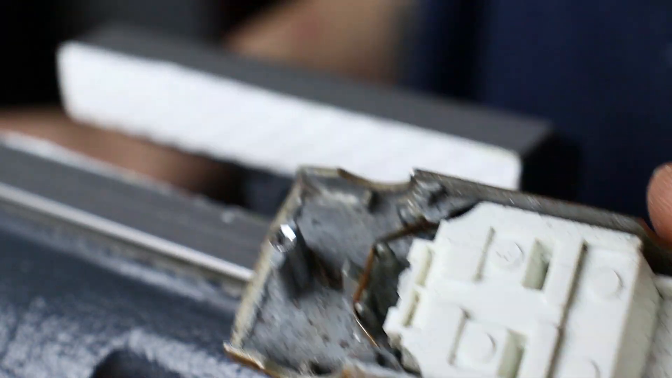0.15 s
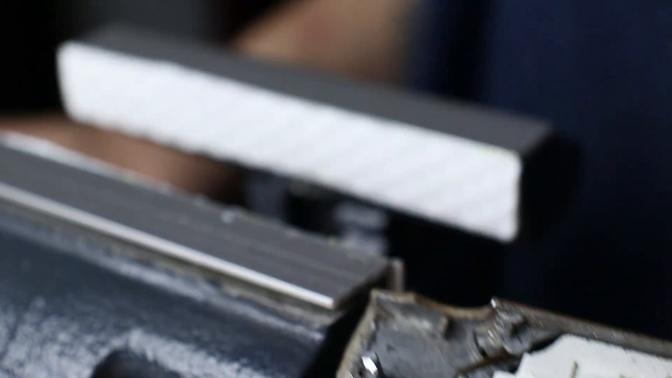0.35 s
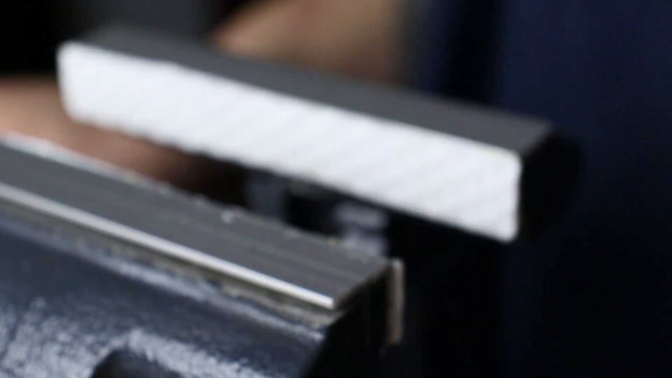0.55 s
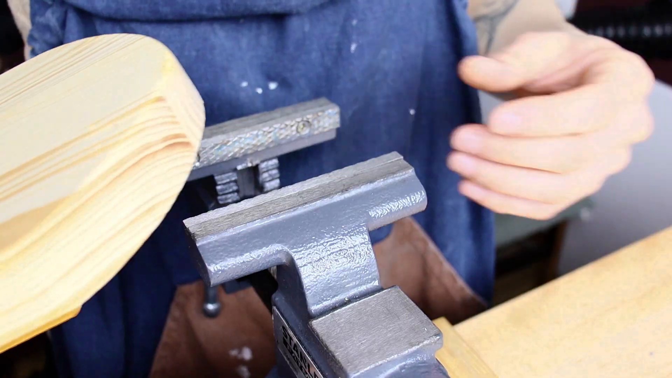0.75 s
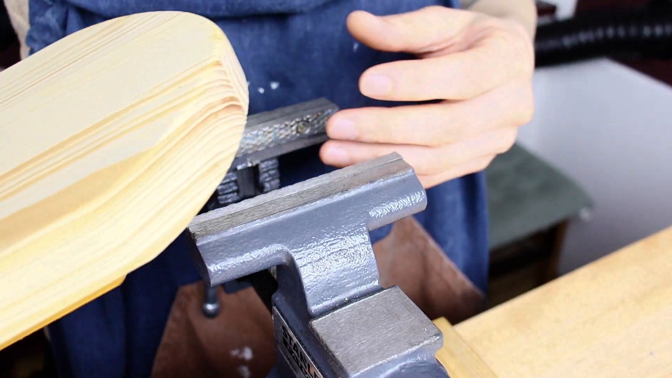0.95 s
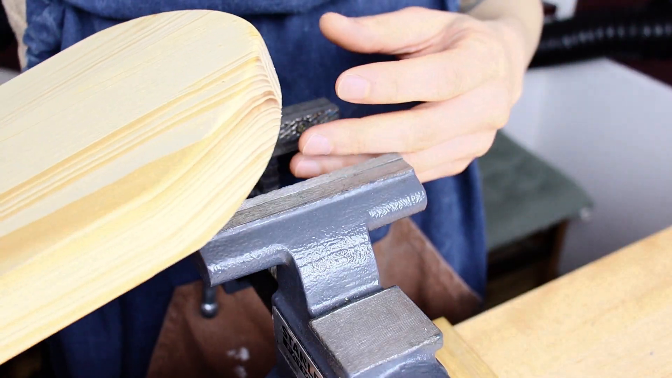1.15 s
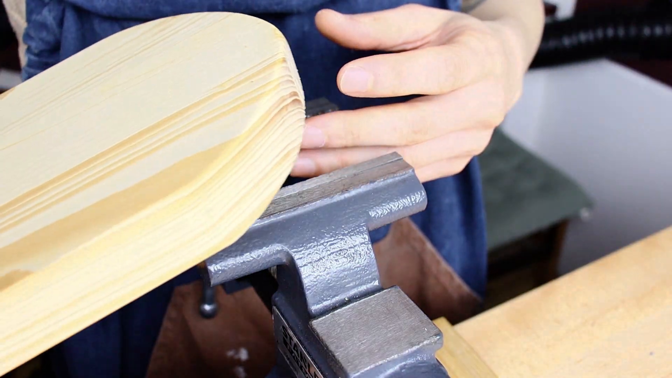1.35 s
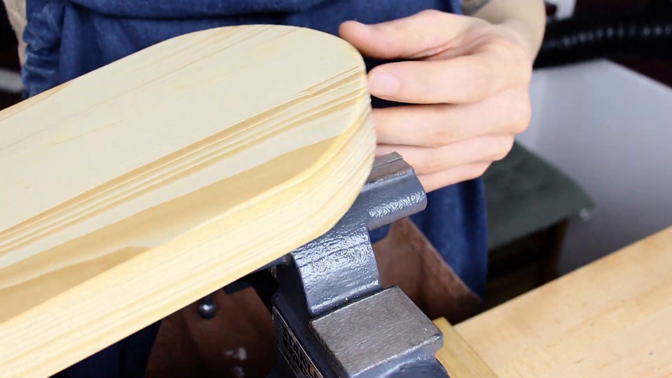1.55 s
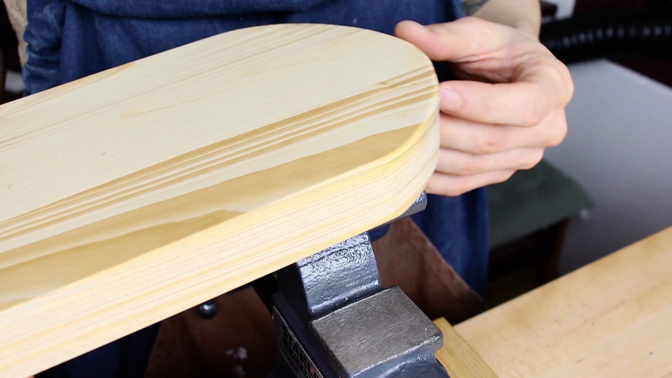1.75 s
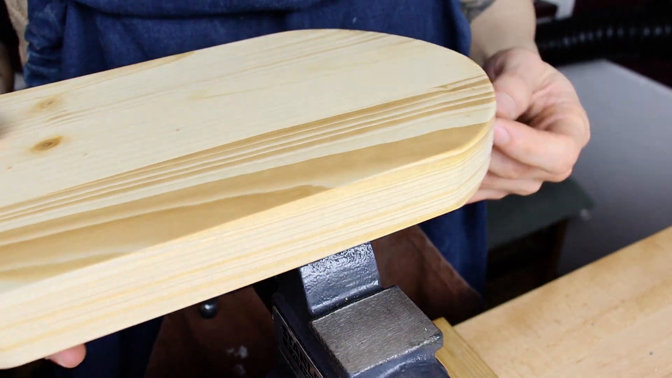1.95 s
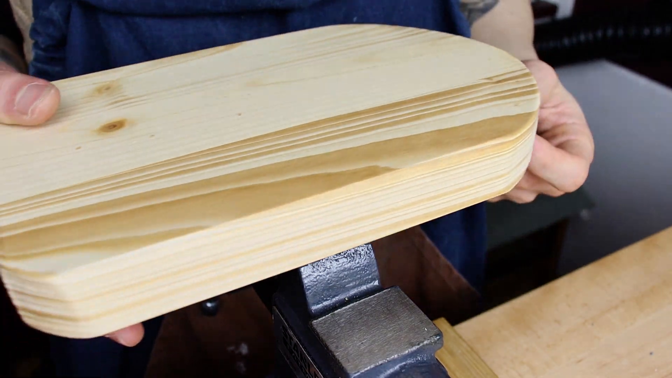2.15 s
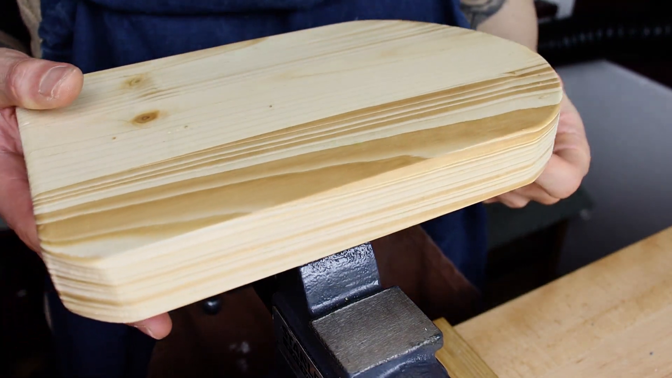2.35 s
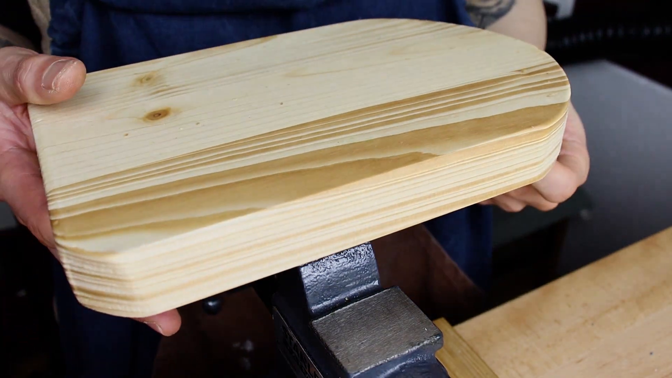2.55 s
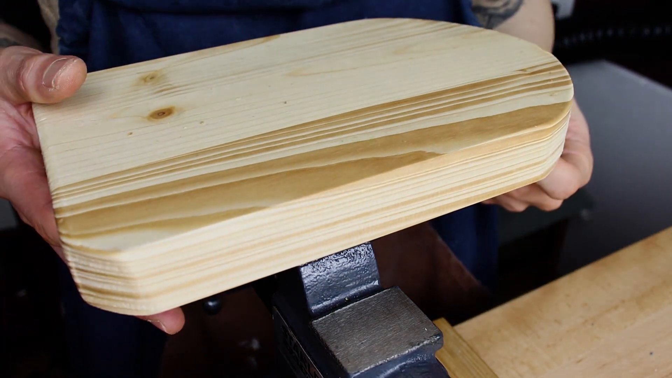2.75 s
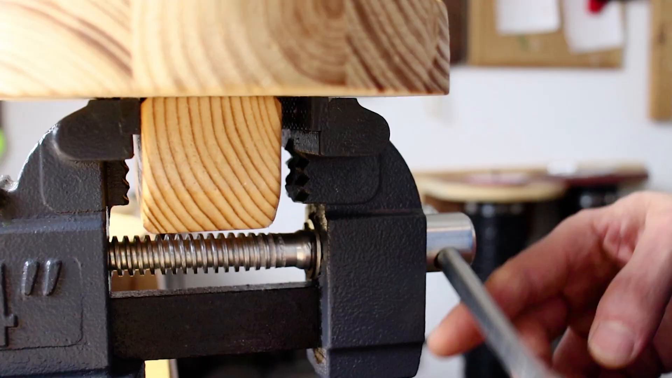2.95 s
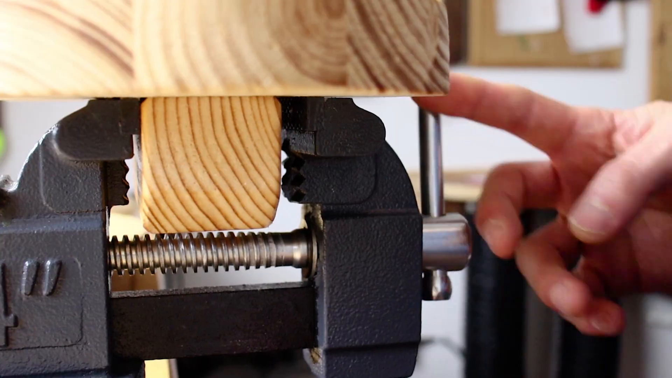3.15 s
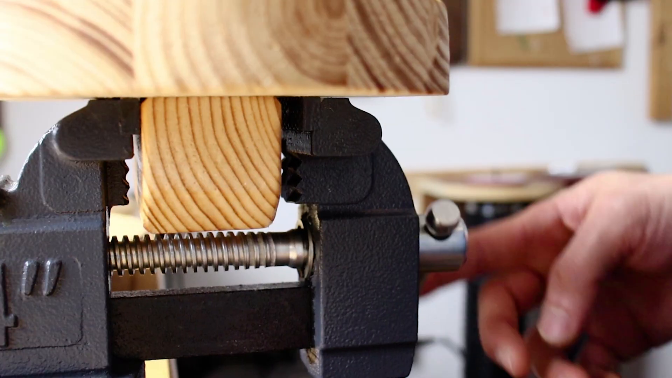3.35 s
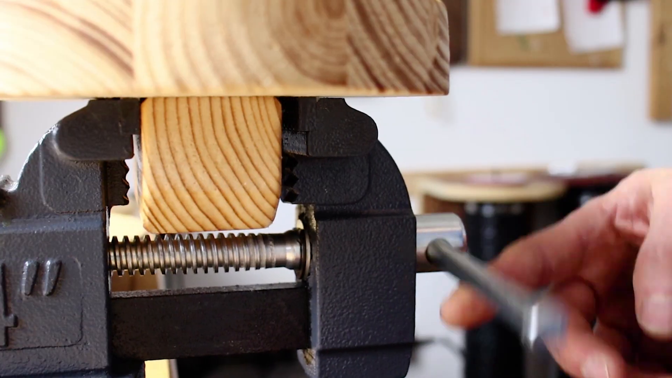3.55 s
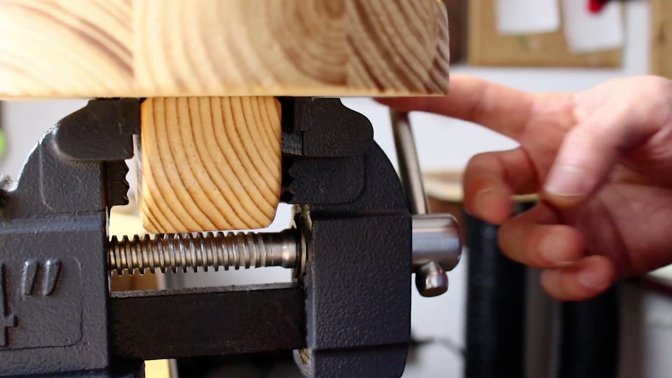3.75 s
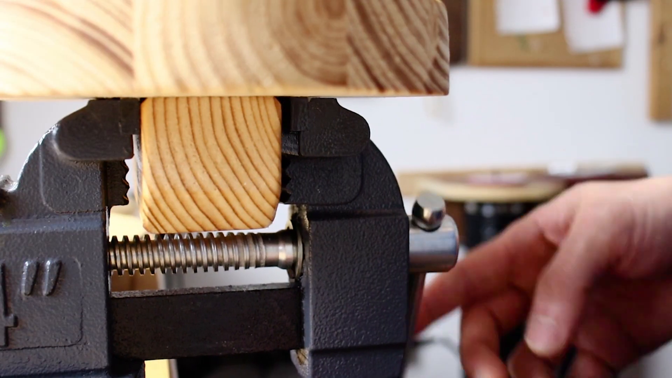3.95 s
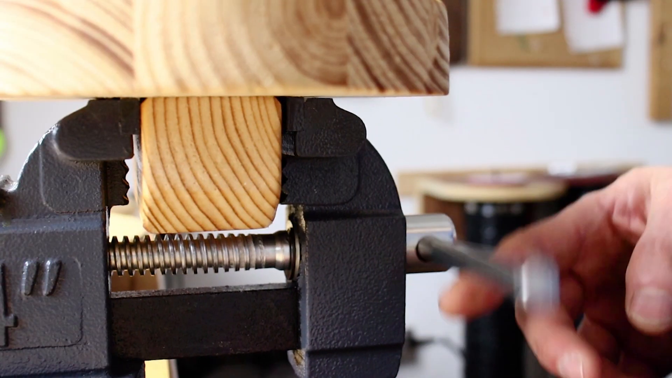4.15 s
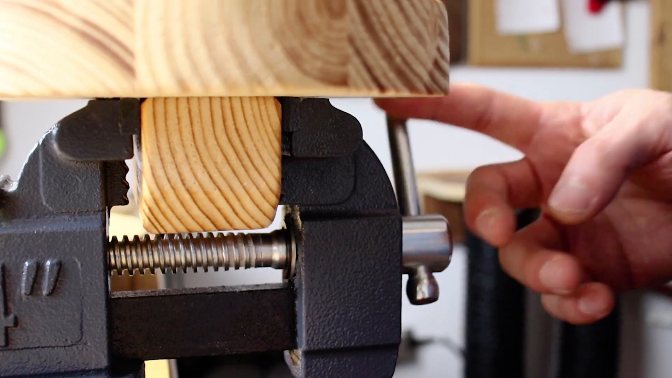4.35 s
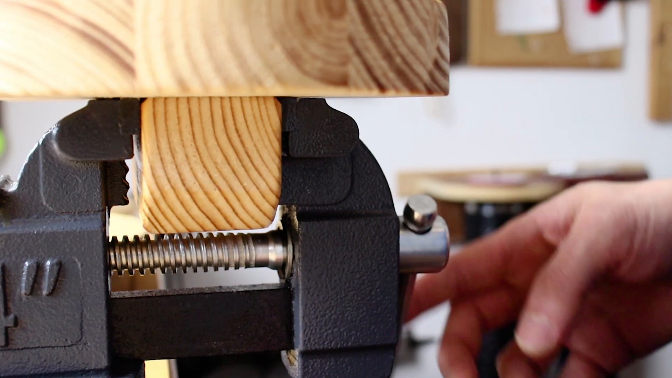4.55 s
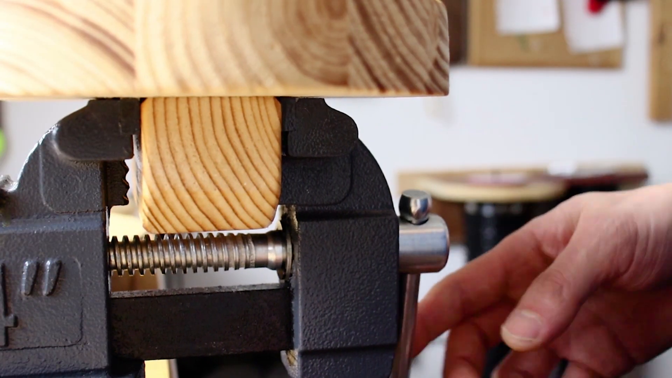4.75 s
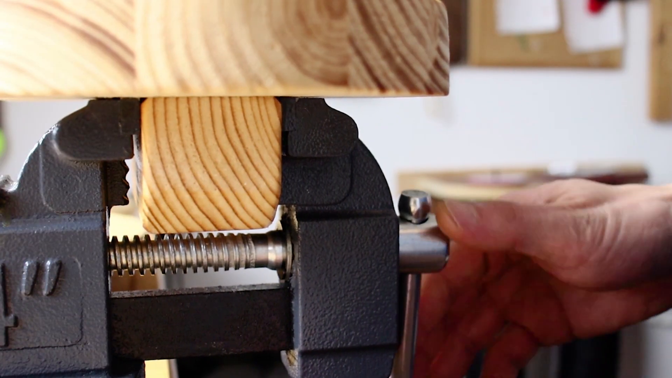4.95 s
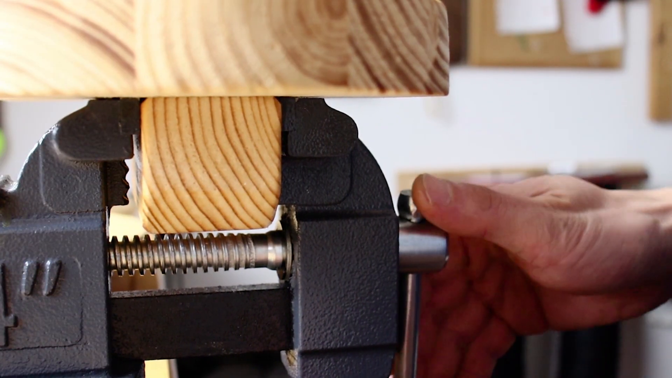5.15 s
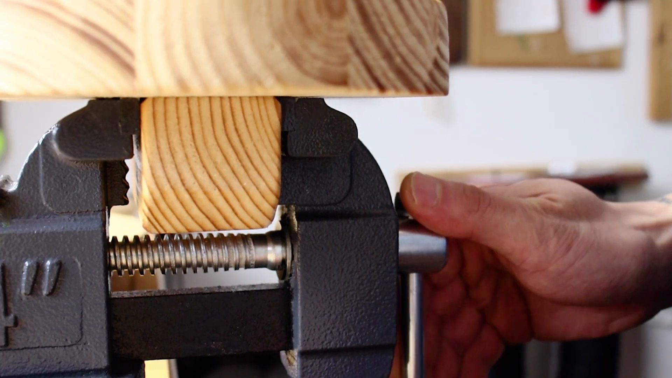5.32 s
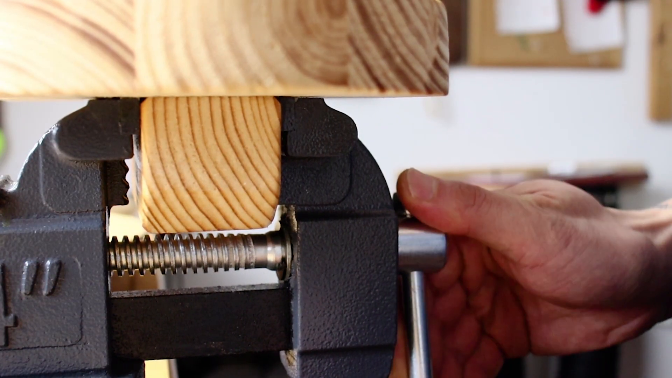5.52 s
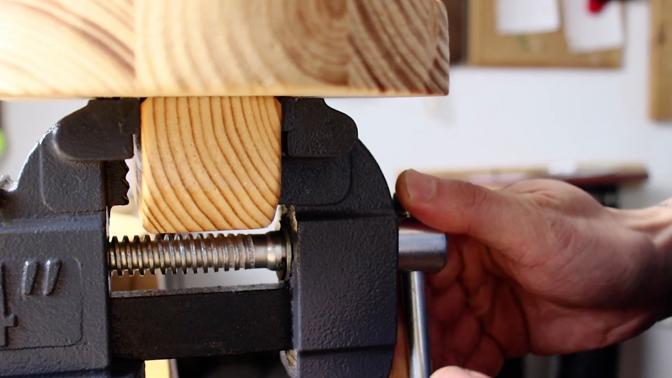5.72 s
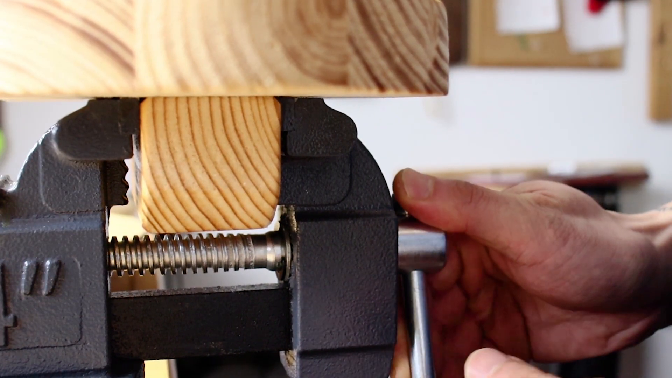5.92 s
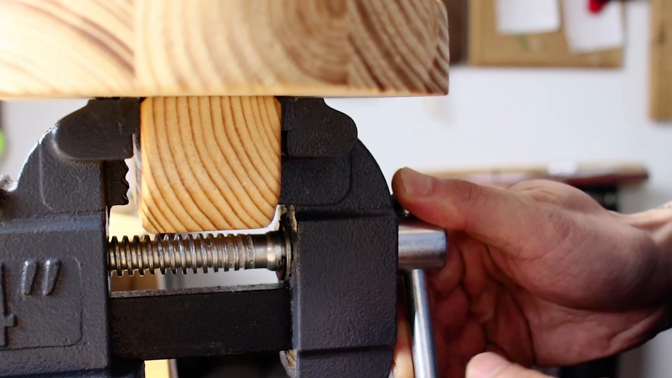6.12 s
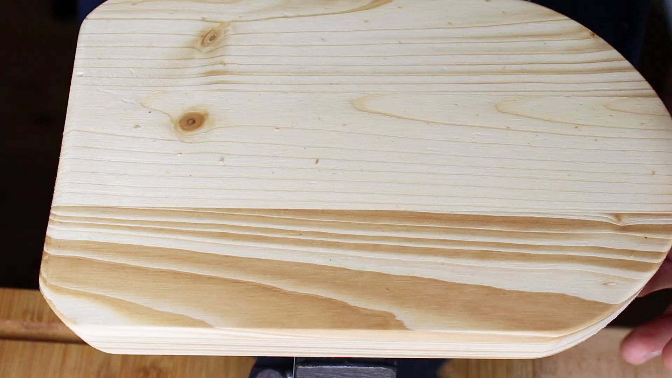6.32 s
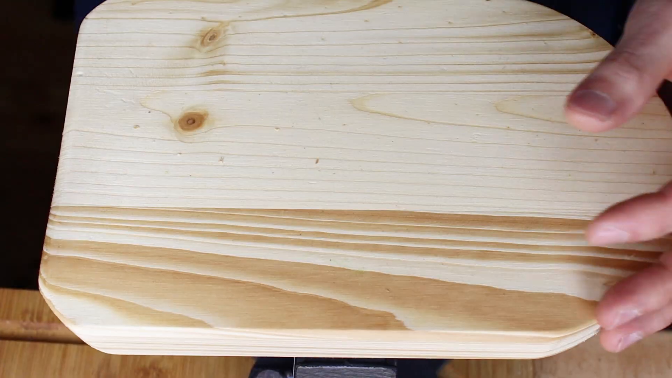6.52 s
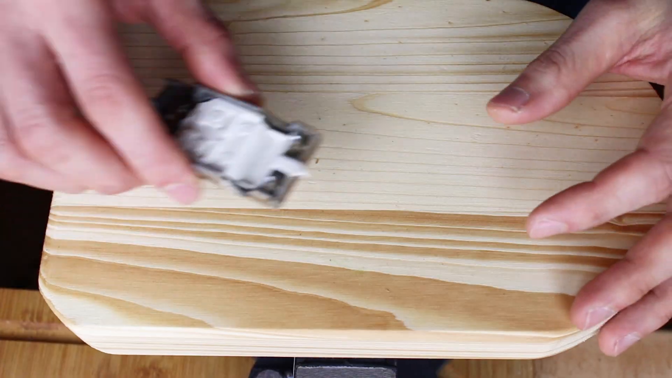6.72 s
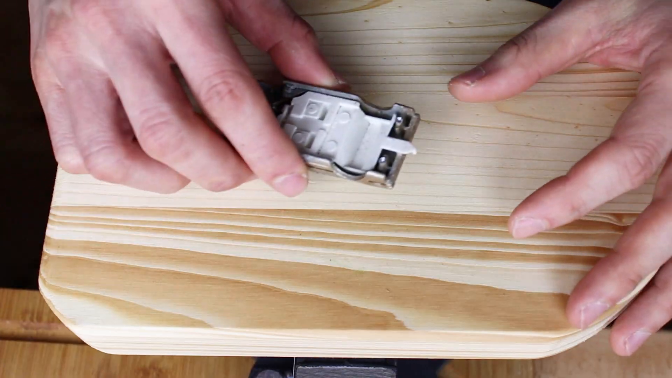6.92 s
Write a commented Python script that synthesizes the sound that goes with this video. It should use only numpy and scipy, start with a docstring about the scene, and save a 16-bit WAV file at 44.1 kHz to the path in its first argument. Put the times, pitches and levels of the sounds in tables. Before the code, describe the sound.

A small workshop heard close up in stereo, with low steady air hiss and a very faint hum in the first second and a half. Near 1.2 s comes a soft brush, at 1.3 s a dull knock of wood on cast iron, then small ticks and another knock at 1.7 s. The board slides along the jaws, rumbling and rasping, strongest around 2.1 s with a firm double knock, and dies away by 2.6 s after a tick. From 3.0 s a loose screw turns, rattling low and unevenly with gritty thread rub and short judders near 3.2, 3.75 and 4.4 s. At 3.5 s and again at 4.7 s the steel handle bar drops: a hard crack and bright, rough metallic ring, choked almost at once, with a short room tail. After 5 s it is nearly still, with faint rubs, a crisp little tick at 6.3 s and a tiny touch at 6.9 s.

```python
"""Wood knocks and rasps on iron, a loose screw rattles, and twice a bar clinks, in a small workshop.
A pine board is set into a cast-iron bench vise and slid along the jaws: noise shaped by wood and iron.
A finger spins the screw, which rumbles through vise and bench: uneven noise and short judders.
Twice the loose handle bar drops through its hole and clinks: a noisy crack and many ringing sines.
Then the screw is quietly nipped tight, with faint ticks and rubs. Air noise and a faint hum lie beneath."""
import sys
import numpy as np
from scipy import signal
from scipy.fft import rfft, irfft, next_fast_len
from scipy.io import wavfile
from scipy.ndimage import uniform_filter1d

SR = 44100
rng = np.random.default_rng(int(sys.argv[2]) if len(sys.argv) > 2 else 0)


def transcribe(u):
    """Save the signal u as a 16-bit wav file named by the first command-line argument.

    u: samples, shape (n,) or (channels, n), limited to [-1, 1]; the rate is SR.
    q: integer samples, one column per channel.
    """
    v = np.clip(np.atleast_2d(u).T, -1, 1)
    q = np.round(v * 32767).astype(np.int16)
    wavfile.write(sys.argv[1], SR, q)


N = 307741
TIME = np.arange(N) / SR
SIZE = next_fast_len(N, True)  # a length that transforms quickly
HZ = np.fft.rfftfreq(SIZE, 1 / SR)

# how alike the left and right sound of nearby sources is: (frequency [Hz], likeness [-1 to 1])
NEAR_SAME = [(100, 0.94), (400, 0.93), (1000, 0.53), (3000, 0.12), (10000, 0.09)]


def amp(db):
    """Turns decibels into gain."""
    return 10 ** (np.asarray(db) / 20)


def evened(x):
    """Scales a sound to an rms of 1."""
    return x / np.sqrt(np.mean(x ** 2) + 1e-20)


def read(points, hz):
    """Reads a table between its points, on a log-frequency axis."""
    f, value = np.transpose(points)
    return np.interp(np.log(hz + 1), np.log(f + 1), value)


def bins(x):
    """Lists the frequencies of a signal's spectrum."""
    return np.fft.rfftfreq(x.shape[-1], 1 / SR)


def colour(x, db):
    """Filters by a gain for each frequency, then scales to rms 1."""
    return evened(irfft(rfft(x) * amp(db), x.shape[-1]))


def panned(db):
    """Gives left and right gains for a level difference (plus is louder on the left)."""
    return amp(np.array([[db], [-db]]) / 2)


def add(mix, s, sound):
    """Mixes a sound in at a time in seconds."""
    part = mix[:, round(s * SR):][:, :sound.shape[-1]]
    part += sound[..., :part.shape[1]]


def noise_pair(size, same):
    """Makes white noise at two microphones, as alike at each frequency as the table says."""
    a, b = rng.standard_normal((2, size))
    likeness = np.clip(read(same, bins(a)), -1, 1)
    mid = rfft(a) * np.sqrt((1 + likeness) / 2)
    side = rfft(b) * np.sqrt((1 - likeness) / 2)
    return irfft(np.array([mid + side, mid - side]), size)


def friction(spectrum_db, slips_hz, uneven_db):
    """Tiny slips come in clumps and shake a body with the given spectrum."""
    slow = rfft(rng.standard_normal(SIZE)) / (1 + (HZ / slips_hz) ** 2)
    clumps = evened(irfft(slow, SIZE))
    slips = noise_pair(SIZE, NEAR_SAME) * amp(uneven_db * np.clip(clumps, -2, 2))
    return colour(slips, spectrum_db)[:, :N]


def stroke(rows, ease=.004):
    """Draws the gain curves of one movement, silent outside it, smoothed over ease seconds."""
    s, *levels = np.transpose(sorted(map(tuple, rows)))
    curves = []
    for db in levels:
        gain = amp(np.interp(TIME, s, db, left=-np.inf, right=-np.inf))
        curves.append(uniform_filter1d(gain, round(ease * SR)))
    return curves


def swell(middle, length):
    """Makes a smooth rise and fall around a moment."""
    return np.cos(np.pi * np.clip((TIME - middle) / length, -.5, .5)) ** 2


def contact(db, hz, octaves, t60, rise=0.00061):
    """A touch makes a short burst of noise around its own pitch, coloured by the casting."""
    # how the casting colours every small contact: (frequency [Hz], gain [dB])
    casting = [(300, 17), (680, 12), (820, 2), (1100, 8), (1400, 5.5), (1700, -11.5), (2000, 0.5),
               (2450, 5.5), (2750, -2), (3100, 0.5), (4200, -3), (5200, 0), (6000, -2), (15000, -7)]
    t = np.arange(SR // 5) / SR
    distance = np.log2((bins(t) + 1) / hz) / octaves
    shape_db = read(casting, bins(t)) - 20 * np.log10(1 + distance ** 2)
    burst = colour(noise_pair(len(t), NEAR_SAME), shape_db)
    return burst * amp(db - 60 * t / t60) * (1 - np.exp(-t / rise))


def background():
    """Still room air with microphone hiss is steady noise; a faint far hum is a sine in a murmur."""
    # spectrum of the air and hiss: (frequency [Hz], relative level per Hz [dB])
    air = [(15, -61.5), (25, -27), (38, -19.5), (59, -4.5), (127, -7), (157, -3), (263, -6.5), (354, -8.5),
           (560, -9), (818, -9), (1330, -10.5), (1840, -11), (16000, -22)]
    # how alike left and right are in the air: (frequency [Hz], likeness [-1 to 1])
    air_same = [(60, 0.4), (180, 0.47), (550, 0.16), (1650, -0.064), (4970, 0.059), (15000, -0.25)]
    # murmur around the hum: (frequency [Hz], relative level per Hz [dB])
    murmur = [(50, -23.5), (100, -7), (165, 1.5), (260, -18), (600, -46.5)]
    # stretches of hum: (start [s], end [s], first pitch [Hz], last pitch [Hz],
    # first level [dB], last level [dB])
    hum = [(0, 0.693, 121.1, 134.6, -61, -65), (.73, 1.5, 170.8, 172.6, -68, -71)]
    air_db, murmur_db = -58.5, -3.5  # the murmur is relative to the hum

    out = amp(air_db) * colour(noise_pair(SIZE, air_same), read(air, HZ))[:, :N]
    drone = amp(murmur_db) * colour(noise_pair(SIZE, NEAR_SAME), read(murmur, HZ))[:, :N]
    for start, end, first_hz, last_hz, first_db, last_db in hum:
        level, = stroke([(start, first_db), (end, last_db)], ease=0.032)
        turns = np.cumsum(np.interp(TIME, [start, end], [first_hz, last_hz])) / SR
        tone = np.sqrt(2) * np.sin(2 * np.pi * turns)  # rms 1
        out += level * (tone + drone)
    return out


def rubs():
    """Stick and slip swells and fades in one narrow resonance."""
    # hand, board and bar brush the vise: (middle [s], level [dB], pitch [Hz], width [Hz], length [s])
    brushes = [(1.17, -62, 320, 60, 0.08), (1.5, -57.5, 197, 200, 0.15), (2.263, -50.5, 240, 180, .06),
               (3.472, -58.5, 2900, 120, .13), (3.751, -59.5, 5150, 130, 0.052),
               (4.91, -57, 390, 250, 0.11), (5.221, -63.5, 266, 35, 0.24), (6.369, -57, 245, 100, 0.067),
               (6.902, -62.5, 677, 60, .035)]
    # dry patches where the rubbed iron sings in one resonance: (middle [s], level [dB], length [s])
    dry_patches = [(1.53, -63, .2), (3.42, -57.5, .17), (4.019, -56, 0.096), (4.331, -58.5, .1),
                   (4.569, -57, .2)]
    dry_hz, dry_width_hz = 1356, 240

    out = np.zeros((2, N))
    singing = [(s, db, dry_hz, dry_width_hz, length) for s, db, length in dry_patches]
    for s, db, hz, width, length in [*brushes, *singing]:
        window = np.hanning(round(length * SR))
        shape_db = -20 * np.log10(1 + (2 * (bins(window) - hz) / width) ** 2)
        rub = colour(noise_pair(len(window), NEAR_SAME), shape_db)
        add(out, s - length / 2, amp(db) * window * rub)
    return out


def knocks(rise=0.00098):
    """Each blow clacks on the casting and rings the low modes of vise and bench."""
    # board and screw knock into the vise: (time [s], thud level before a 9 dB cut [dB],
    # thud tilt [dB per octave], clack level [dB], clack centre [Hz])
    blows = [(1.295, -32, -3, -39, 1460), (1.703, -33.5, -2.5, -43, 2400), (2.062, -35, 3.5, -52, 3300),
             (2.112, -28, 2.5, -30, 450), (3.0224, -36.5, -2, -44, 600)]
    # modes of the vise on its bench: (pitch [Hz], relative level [dB], time to fall 60 dB [s])
    bench = [(99, -2.5, 0.12), (160.8, 0, 0.22), (206.4, -3, 0.19), (299.6, -1.5, 0.19), (488, -6, 0.16),
             (562, -12, 0.13), (930, -26, 0.053), (1216, -14, 0.076)]
    clack_octaves, clack_t60_s = 0.59, 0.031

    out, t = np.zeros((2, N)), np.arange(SR // 2) / SR
    for s, db, tilt_db, clack_db, clack_hz in blows:
        thud = np.zeros(len(t))
        for hz, level, t60 in bench:
            mode_db = level + tilt_db * np.log2(hz / 300)  # the tilt turns around 300 Hz
            thud += amp(mode_db - 60 * t / t60) * np.sin(2 * np.pi * hz * t)
        add(out, s, -amp(db - 9) * thud * (1 - np.exp(-t / rise)))
        add(out, s, contact(clack_db, clack_hz, clack_octaves, clack_t60_s))
    return out


def ticks():
    """Light contacts make small bursts that leave the bench still."""
    # touches of wood and iron: (time [s], level [dB], centre [Hz], width [octaves],
    # time to fall 60 dB [s])
    touches = [(1.487, -51, 1400, .6, .1), (1.5224, -50.5, 1410, 0.61, .08),
               (1.669, -47.5, 1310, 0.59, 0.089), (1.688, -41.5, 1290, 1.2, 0.043),
               (2.1028, -38.5, 1800, 0.83, 0.058), (2.5012, -41, 2280, 0.97, 0.029),
               (3.166, -45, 700, 1.3, 0.046), (3.204, -38.5, 1400, .18, .096),
               (4.203, -45.5, 700, 1.5, 0.084), (3.744, -36, 2800, .4, 0.018),
               (4.3546, -37.5, 2810, 0.13, .025), (4.935, -36, 1780, 0.71, 0.034),
               (6.3358, -33.5, 6900, 2.2, .0083), (6.899, -48.5, 1420, .18, 0.024)]
    out = np.zeros((2, N))
    for s, *tick in touches:
        add(out, s, contact(*tick))
    return out


def board():
    """Wood grain drags over the jaws: a rumble in the bench, a rasp, and the jaw singing along."""
    # the slide: (time [s], pressure, driving the rumble [dB], speed, driving rasp and singing [dB])
    slide = [(1.66, -58.5, -60), (1.70, -41.5, -55.5), (1.76, -59, -58), (1.86, -60, -55.5),
             (1.92, -50, -49), (2.125, -36, -51.5), (2.19, -49, -52), (2.57, -63, -63), (2.66, -79, -75)]
    # spectrum of the rumble: (frequency [Hz], relative level per Hz [dB])
    slide_body = [(18, -51), (30, -20), (160, -3), (221, 1), (265, -5.5), (309, -1.5), (532, -16.5),
                  (581, -13.5), (826, -40), (1000, -22), (1300, -48), (2200, -120)]
    # spectrum of the rasp: (frequency [Hz], relative level per Hz [dB])
    grain = [(700, -6.5), (930, -8.5), (1050, -7.5), (1250, -5.5), (1600, -19.5), (2250, -6.5),
             (2700, -10.5), (3300, -7.5), (3700, -17), (4100, -12), (7000, -21), (15000, -29)]
    # resonances of the iron jaw rung by the grain: (pitch [Hz], width [Hz], relative level [dB])
    jaw = [(3038, 150, 9), (1216, 110, 1), (3590, 270, 0), (2200, 160, -10), (4550, 160, -8)]

    pressure, speed = stroke(slide)
    jaw_power = sum(amp(2 * db) / (1 + (2 * (HZ - f) / width) ** 2) ** 2 for f, width, db in jaw)
    jaw_db = 10 * np.log10(jaw_power)
    rumble = amp(-2.5) * friction(read(slide_body, HZ), slips_hz=39.8, uneven_db=3.0)
    rasp = amp(-2.5) * friction(read(grain, HZ), slips_hz=140, uneven_db=4.5)
    sing = amp(-4.0) * friction(jaw_db, slips_hz=200, uneven_db=3)
    return pressure * rumble + speed * (rasp + sing)


def screw():
    """The loose screw rattles in its nut and the threads rub, both with the effort; binding judders."""
    # the hand turns the screw, then lets it come to rest: (time [s], effort [dB])
    turning = [(3.02, -43), (3.37, -50), (3.48, -39.5), (3.89, -47), (4.12, -47.5), (4.32, -41.5),
               (4.44, -47.5), (5.0, -64), (5.3, -73.5)]
    # spectrum of the rattle: (frequency [Hz], relative level per Hz [dB])
    screw_body = [(24, -57.5), (40, -35), (88, -15.5), (149, -10), (189, -2.5), (226, -2.5), (280, 1),
                  (373, -7), (513, -8), (558, -10.5), (649, -12), (778, -29.5), (893, -18), (944, -18.5),
                  (1100, -25.5), (1430, -57), (2420, -120)]
    # spectrum of the thread rub: (frequency [Hz], relative level per Hz [dB])
    thread = [(750, -11), (950, -5), (1100, -0.5), (1280, 1), (1490, -2.5), (1600, -7.5), (1740, -0.5),
              (2150, -20.5), (2600, -8.5), (2980, -6), (3500, -15.5), (5200, -16), (8500, -26),
              (15000, -33)]
    # the screw binds and judders: (middle [s], level [dB], length [s], judder pitch [Hz])
    binds = [(3.043, -42.5, 0.056, 334), (3.198, -34, .13, 304), (3.252, -37.5, 0.054, 277),
             (3.609, -40.5, 0.075, 296), (3.755, -30, .07, 277), (4.355, -41, 0.046, 300),
             (4.398, -30, .042, 261), (4.705, -36, .1, 262.3)]
    rattle_db = -1.23  # relative to the effort
    bind_rattle_db, bind_judder_db, bind_rub_db = -4.5, -3, -23.5  # relative to the bind
    # thread rub at a usual effort; dB gained per dB of effort
    thread_db, usual_effort_db, thread_growth = -60.5, -45, 0.63

    effort, = stroke(turning)
    binding, judder = np.zeros((2, N))
    for s, db, length, pitch_hz in binds:
        bind = amp(db) * swell(s, length)
        binding += bind
        judder += bind * np.sin(2 * np.pi * pitch_hz * (TIME - s))
    shake = amp(rattle_db) * effort + amp(bind_rattle_db) * binding
    turning_rub = amp(thread_db) * abs(effort / amp(usual_effort_db)) ** thread_growth
    rub = turning_rub + amp(bind_rub_db) * binding
    rattle = friction(read(screw_body, HZ), slips_hz=49.87, uneven_db=1.5)
    threads = friction(read(thread, HZ), slips_hz=99.7, uneven_db=4.0)
    return (shake * rattle + rub * threads + amp(bind_judder_db) * judder) * panned(1.44)


def clinks(crack_t60=0.15, crack_rise=0.00039):
    """The bar chatters in its hole for a moment, then seats on its knob, which chokes the ring."""
    # the bar lands on one end, then on the other: (time [s], crack level [dB], time until it seats [s])
    drops = [(3.4995, -21, .0148), (4.6893, -19, 0.012)]
    # modes of bar and spindle head: (pitch [Hz], level on the first end [dB], level on the second
    # end [dB], build-up [s], time to fall 60 dB while free [s], left over right [dB])
    bar = [(935, -50, -24, 0.00064, 0.15, 2.5), (1019, -28.5, -28, 0.0017, 0.1075, -3.5),
           (1461, -24, -40.5, 0.00089, 0.1, 7), (1609, -27, -37, 0.00102, 0.065, 5.5),
           (2410, -25, -37.5, 0.00068, 0.062, -1), (2584, -26, -21.5, 0.0042, 0.243, -10.5),
           (2735, -20.5, -26, 0.0028, 0.11, 5.5), (3290, -27, -35.5, 0.00097, 0.067, 0.5),
           (5130, -18, -17, 0.005, 0.17, 3.5), (5235, -24, -27.5, .004, 0.16, -8),
           (6580, -18, -23, 0.0011, 0.11, -8.5), (6703, -8, -13, .0007, 0.038, -12),
           (6940, -25.5, -13, 0.00082, .07, 0), (7380, -29.5, -26, .001, 0.051, -2),
           (8280, -28, -32, 0.00097, 0.14, 8), (9340, -39.5, -26, .001, 0.0431, 0.5),
           (13000, -15.5, -33, 0.0055, 0.095, -13.5), (13040, -22, -12.5, 0.0037, 0.2, -13)]
    # the crack of steel on steel: (frequency [Hz], relative level per Hz [dB])
    steel = [(30, -44.5), (70, -22), (190, 0.5), (330, -6), (600, -0.5), (760, -24), (950, 5), (1500, -8.5),
             (2100, -5.5), (3000, -3), (4200, -5.5), (7300, -3.5), (8800, -11), (10800, -17), (12600, -3),
             (14000, -35)]
    # the chatter widens a mode at this pitch to this line width; it grows with pitch
    chatter_hz, chatter_at_hz = 14, 5000
    # what is left once the bar has seated, and how quickly it seats
    choke_db, choke_hz_per_db, crack_rest_db = -10.5, 1500, -16.5
    seated_t60_s, seat_s = .25, 0.002

    out, t = np.zeros((2, N)), np.arange(SR // 2) / SR
    for end, (s, crack_db, seats) in enumerate(drops):
        free = (1 - np.tanh((t - seats) / seat_s)) / 2
        seated = (1 - free) * amp(-60 * (t - seats) / seated_t60_s)
        for hz, *ends_db, rise, free_t60, pan_db in bar:
            # chattering contact jolts the phase, which roughens and widens the line
            jolt_size = np.sqrt(2 * np.pi * chatter_hz * hz / chatter_at_hz / SR)
            jolts = np.cumsum(rng.standard_normal(len(t))) * jolt_size
            # the right side leads or lags by up to a quarter turn
            right_turns = rng.choice([-1, 1]) * min(hz / 8000, .25)
            phase = rng.random() + np.array([[0], [1]]) * right_turns
            mode = np.sin(2 * np.pi * (hz * t + phase) + jolts) * (1 - np.exp(-t / rise))
            choked = amp(choke_db - hz / choke_hz_per_db) * seated  # treble is choked most
            ring = amp(-60 * np.minimum(t, seats) / free_t60) * (free + choked)
            add(out, s, amp(ends_db[end]) * panned(pan_db) * ring * mode)
        crack = colour(noise_pair(len(t), NEAR_SAME), read(steel, bins(t)))
        fade = free * amp(-60 * t / crack_t60) + amp(crack_rest_db) * seated
        add(out, s, crack * amp(crack_db) * fade * (1 - np.exp(-t / crack_rise)))
    return out


def room(x, first_echo=0.0063):
    """The workshop walls return a dense short tail, each band dying at its own speed."""
    # how long the tail lasts: (frequency [Hz], time to fall 60 dB [s])
    room_t60 = [(100, 0.3), (500, 0.23), (2600, 0.33), (7000, 0.26), (13000, 0.18)]
    # how strongly the room answers: (frequency [Hz], level before the tail's fade-in [dB])
    room_send = [(100, -10.5), (500, -1), (1200, -0.5), (2600, -1), (5200, -4), (6700, -3.5), (13000, -3)]

    hz, t, z = signal.stft(noise_pair(SR * 3 // 4, NEAR_SAME), SR, nperseg=256)
    t60 = read(room_t60, hz)[:, None]
    unit_energy = np.sqrt(2 * np.log(1000) / (t60 * SR))
    fade = amp(read(room_send, hz)[:, None] - 60 * t / t60)
    tail = signal.istft(z * unit_energy * fade, SR, nperseg=256)[1]
    # the tail fades in over first_echo seconds
    tail *= np.minimum(np.arange(tail.shape[1]) / SR / first_echo, 1) ** 2
    return signal.fftconvolve(x.mean(0)[None], tail, axes=1)[:, :N]


def scene():
    """Puts all the work at the vise in its room, over the background."""
    vise = rubs() + knocks() + ticks() + board() + screw() + clinks()
    return vise + room(vise) + background()


def record(dry):
    """The recorder rolls off the bass and cuts the highest treble."""
    bass_hz, edge_hz = 44, 15900
    dry = signal.sosfilt(signal.butter(2, bass_hz, "high", fs=SR, output="sos"), dry)
    low_pass = signal.firwin(255, edge_hz, window=("kaiser", 10), fs=SR)
    return signal.oaconvolve(dry, low_pass[None], "same", axes=1)


dry = scene()
out = record(dry)
transcribe(out)
```